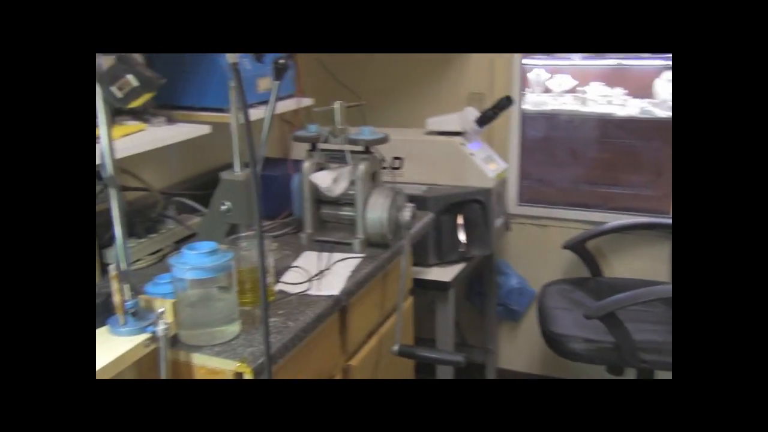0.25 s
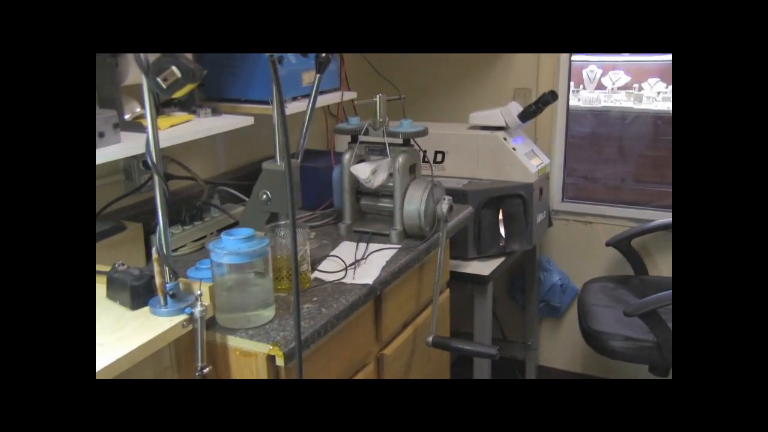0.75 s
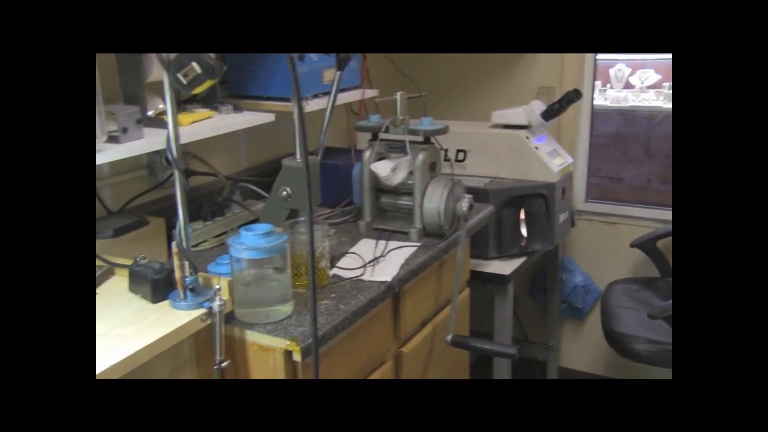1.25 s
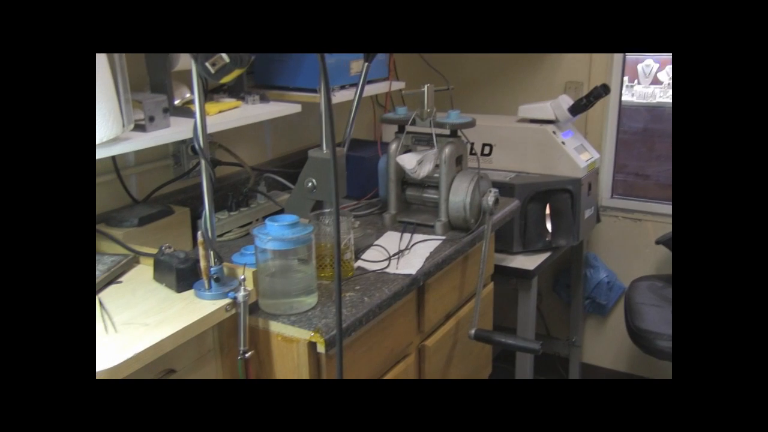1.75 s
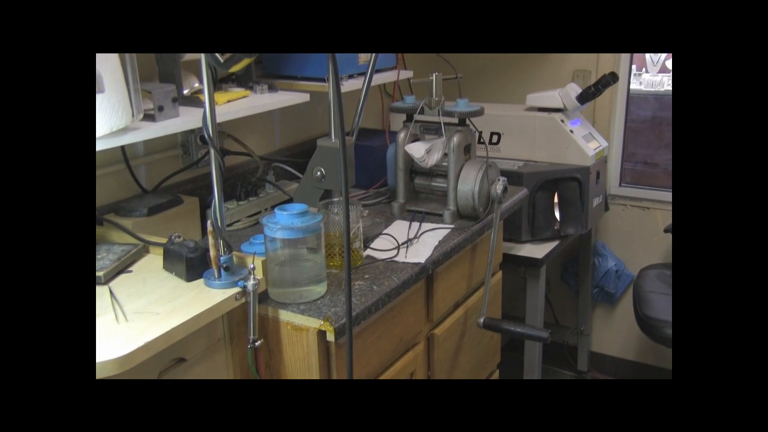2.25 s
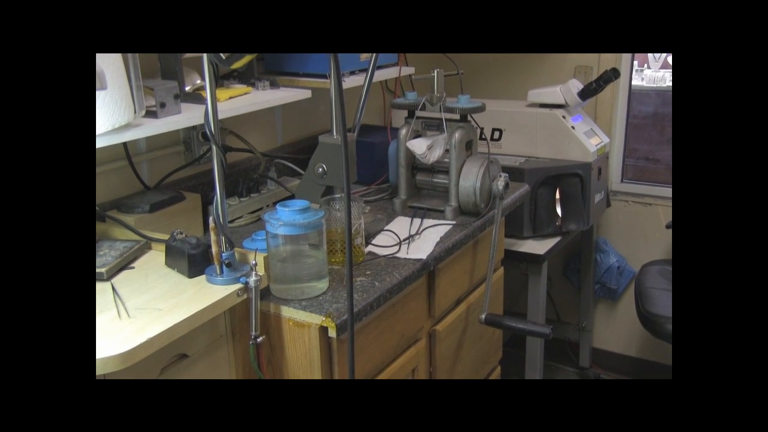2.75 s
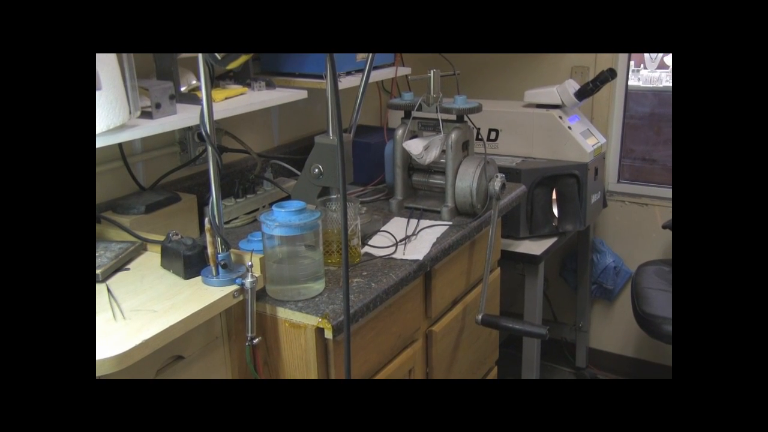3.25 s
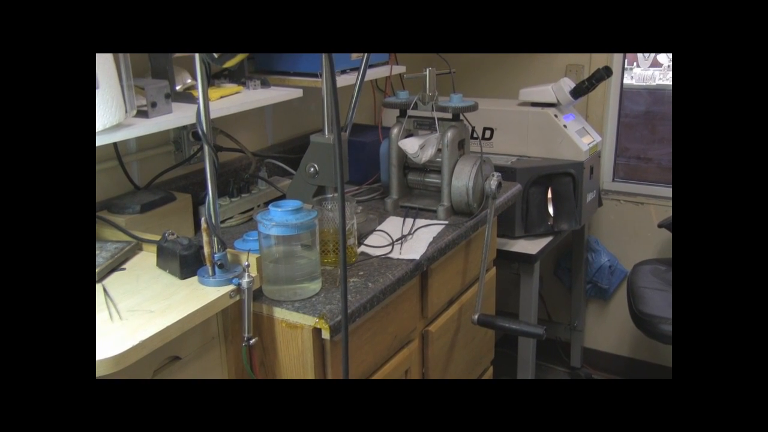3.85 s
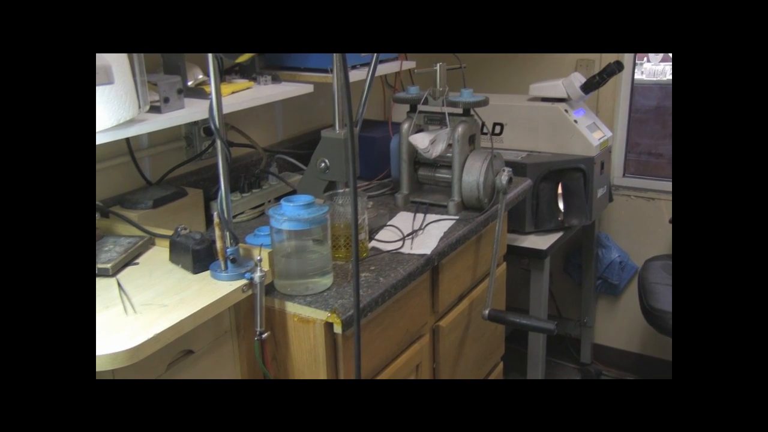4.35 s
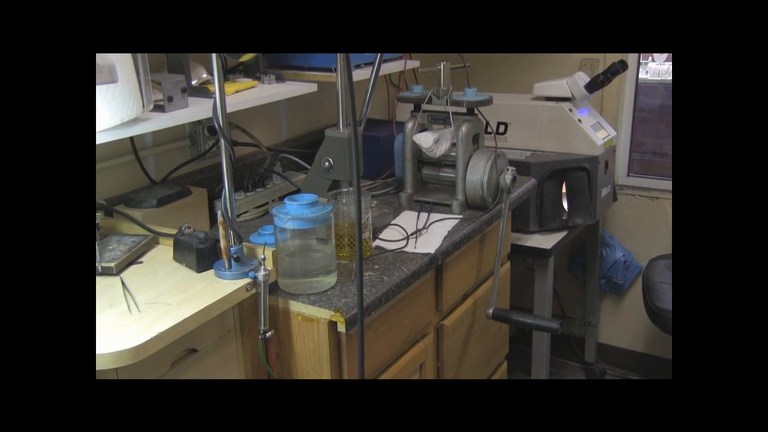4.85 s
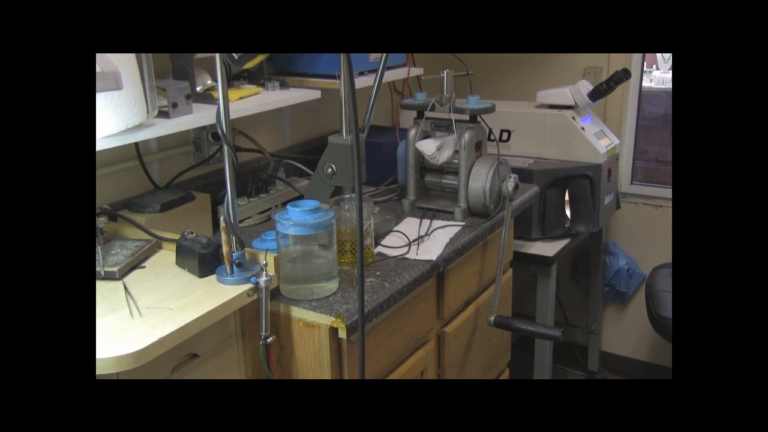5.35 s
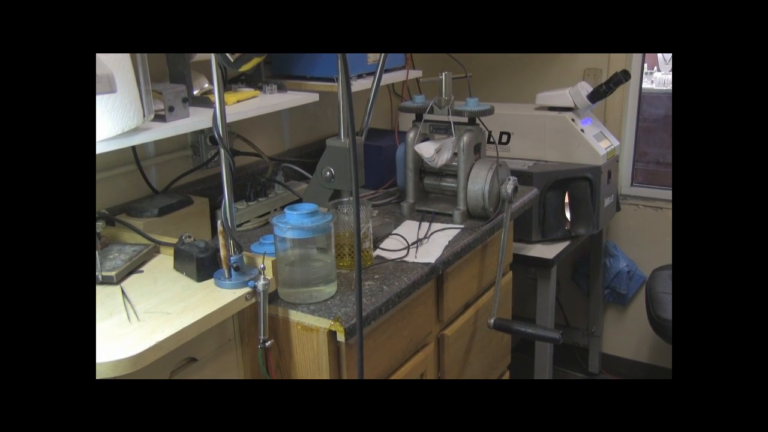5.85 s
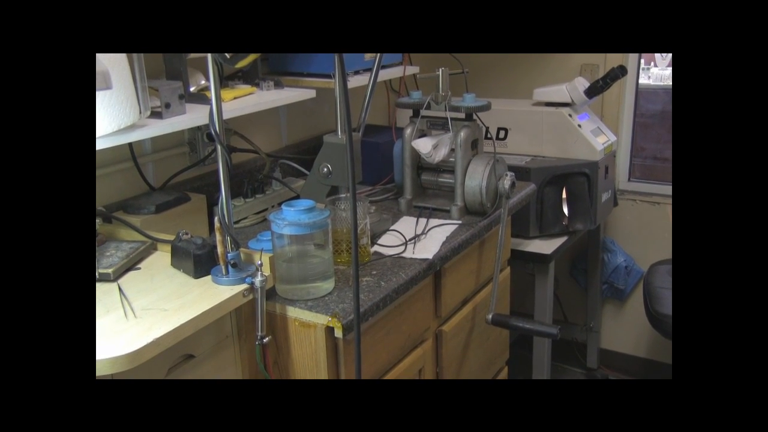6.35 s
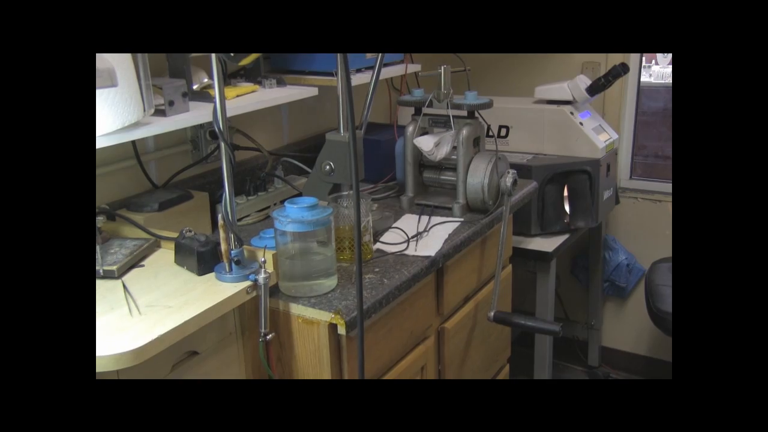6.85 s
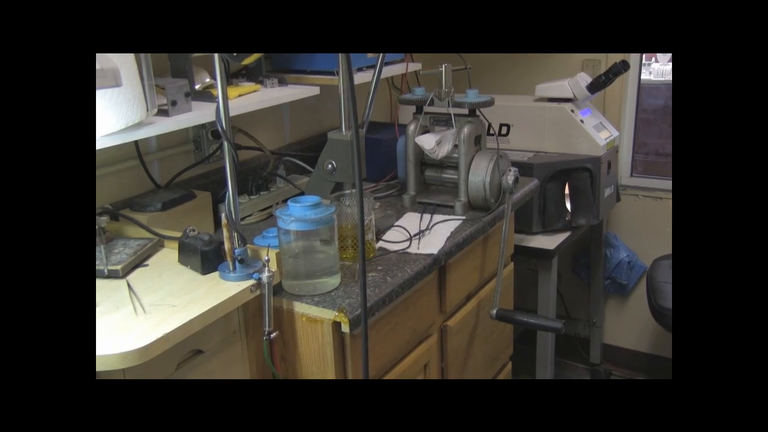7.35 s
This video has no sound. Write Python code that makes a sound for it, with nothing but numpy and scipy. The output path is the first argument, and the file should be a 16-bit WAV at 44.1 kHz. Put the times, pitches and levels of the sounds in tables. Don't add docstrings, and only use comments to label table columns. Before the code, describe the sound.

Two blasts of pressurised steam heard nearby in a hard-walled workroom. The first is short, whistling and spitting, ending in ragged puffs. A brief gap holds low room hum and a rattling metal clatter on the bench. A sharp double valve clack releases the second blast, wet and roaring at first, then dry, bright and long, with slight ticks before it tapers into a final click.

```python
import sys
import numpy as np
from scipy import signal
from scipy.fft import rfft, irfft, next_fast_len
from scipy.io import wavfile
from scipy.ndimage import uniform_filter1d

SR = 44100
rng = np.random.default_rng(int(sys.argv[2]) if len(sys.argv) > 2 else 0)


def attenuation_scalar(level_db):
    decades = np.asarray(level_db, float) / 20
    return 10 ** decades


def generate_wav(sig):
    pcm = np.round(np.clip(np.atleast_2d(sig).T, -1, 1) * 32767).astype(np.int16)
    wavfile.write(sys.argv[1], SR, pcm)


N = 335160

FRAME, HOP = 1024, 256
HZ = np.fft.rfftfreq(FRAME, 1 / SR)[:, None]
FRAME_S = (np.arange(N // HOP + 6) * HOP / SR)[None]
FINE_HZ = np.fft.rfftfreq(N, 1 / SR)
TIME_S = np.arange(N) / SR


def read(points, hz):
    f, value = np.transpose(points)
    return np.interp(np.log(hz + 1), np.log(f + 1), value)


def curves(rows, t):
    s, *columns = np.transpose(rows)
    return [np.interp(t, s, column) for column in columns]


def swells(base_db, rows, t):
    power = attenuation_scalar(2 * base_db)
    for s, db, half_s in rows:
        power = power + attenuation_scalar(2 * db) * np.exp(-((t - s) / half_s) ** 2)
    return 10 * np.log10(power)


def shape(points, lo_hz, hi_hz, grid=HZ):
    inside = (grid > points[0][0]) * (grid < points[-1][0])
    power = attenuation_scalar(2 * read(points, grid)) * inside
    return power / power[(grid > lo_hz) & (grid < hi_hz)].sum()


def peaks(modes, grid=HZ):
    out = 0
    for hz, width, db in modes:
        bump = 1 / (1 + (2 * (grid - hz) / width) ** 2) ** 2
        out = out + attenuation_scalar(2 * db) * bump / bump.sum(0)
    return out


def drift(size, *spans):
    z = rng.standard_normal(size)
    for axis, span in enumerate(spans):
        span = max(int(span), 1)
        z = uniform_filter1d(uniform_filter1d(z, span, axis), span, axis)
    return z / z.std()


def flutter(depth_db, span):
    return attenuation_scalar(depth_db * drift(N, span))


# frequency in Hz, likeness from 0 to 1.
COHERENCE = [(55, 1), (150, 0.9), (300, 0.79), (500, 0.95), (900, 0.26), (1700, 0.43), (3300, 0.23),
             (4700, 0.078), (6600, 0.56), (13000, 0.37)]
# frequency in Hz, left minus right in dB.
PORT_LEAN = [(60, 18), (110, 7), (200, 4), (380, 1.5), (700, -3.5), (1290, -2.5), (2380, -2), (4400, -0.5),
             (8120, -1.0), (15000, -2)]


def ports(first, second, lead, grid):
    alike = np.clip(read(COHERENCE, grid), 0, 1)
    turn = np.exp(-1j * read(lead, grid))
    left, right = attenuation_scalar(read(PORT_LEAN, grid) / 2), attenuation_scalar(-read(PORT_LEAN, grid) / 2)
    middle = (left ** 2 + right ** 2 + 2 * left * right * alike * turn.real) / 4
    mixed = alike * first + np.sqrt(1 - alike ** 2) * second
    return np.array([left * first, right * turn * mixed]) / np.sqrt(middle)


def steady(power, lead):
    a, b, c, d = rng.standard_normal((FINE_HZ.size, 4)).T
    return irfft(ports(a + 1j * b, c + 1j * d, lead, FINE_HZ) * np.sqrt(power) * N / 2, N)


# frequency in Hz, left lead in radians.
JET_PHASE = [(50, -2.5), (300, 0), (600, -2.14), (1200, -2.5), (1700, -3.5), (3300, -4.5), (4700, -6),
             (6600, -7), (9300, -7), (13000, -6)]


def noise(power, ripple_db, patchy_db):
    size = (FRAME_S.size, HZ.size)
    a, b, c, d = rng.standard_normal((*size, 4)).T
    z = ports(a + 1j * b, c + 1j * d, JET_PHASE, HZ)
    z *= attenuation_scalar(ripple_db * drift(size, 107, 1).T + patchy_db * drift(size, 7, 5).T)
    z *= np.sqrt(3 / 2 * power)
    return signal.istft(z, nperseg=FRAME, noverlap=FRAME - HOP)[1][:, :N]


# frequency in Hz, density in dB per Hz.
AIR_SPECTRUM = [(100, -53), (125, -6), (220, -4.5), (330, -6.5), (420, -2.5), (500, -3), (740, -4),
                (1010, -11), (1500, -12.5), (2500, -21.5), (5000, -27.5), (9000, -36), (15900, -36)]
# frequency in Hz, width in Hz, level in dB.
DUCT_MODES = [(146.7, 31.5, -2.5), (230.4, 51, -11.5), (430.4, 24, -7)]
# frequency in Hz, density in dB per Hz.
RUMBLE_SPECTRUM = [(15, 2), (40, -4), (75, -2), (115, -2)]
# frequency in Hz, left lead in radians.
ROOM_PHASE = [(100, -0.92), (420, -1.48), (800, -0.47), (1300, 1), (3300, -0.92), (13000, -0.42)]
# time in seconds, gain as air level in dB, bass cut in dB.
GAIN_CONTROL = [(0.0, -35, -14), (0.4, -35.5, -23), (0.9, -33, -13), (1.3, -35, -4.5), (1.688, -35.5, -5),
                (1.69, -41.5, -7), (2.05, -44.5, -9), (2.45, -43, -7), (2.7, -37.5, -28),
                (2.98, -44.5, -30), (3.63, -49, -20), (4.58, -50, -25), (4.66, -50.5, -50),
                (5.01, -51.5, -52), (5.1, -51, -19), (6.0, -49.5, -19), (7.2, -51.5, -14),
                (7.6, -43.5, -11)]
# middle in seconds, level in dB, half length in seconds.
DUCT_SURGES = [(0.253, -32.5, 0.11), (0.635, -31, 0.17), (0.83, -30, 0.062), (1.027, -32, .08),
               (1.197, -32.5, 0.054), (1.42, -45, 0.058), (2.474, -27.5, 0.046), (2.74, -37, 0.11),
               (3.097, -56, 0.12), (3.7, -52, 0.47), (4.7, -55.5, 0.28), (5.5, -57.5, .3),
               (7.0, -53.5, 0.086), (6.22, -48, 0.027), (6.307, -37.5, 0.027), (6.383, -39, .022),
               (6.6, -50, .03), (6.68, -53, 0.039)]
HUM_HZ, HUM_LEAD_RAD, HUM_LEAN_DB = 58.5, 0.9, 9.5
RUMBLE_DB = -5
DRONE_DB, DRONE_WOBBLE_DB = -22, 1


def room():
    air_db, cut_db = curves(GAIN_CONTROL, TIME_S)
    air = steady(shape(AIR_SPECTRUM, 220, 1010, grid=FINE_HZ), ROOM_PHASE)
    air = attenuation_scalar(air_db) * air * flutter(0.88, 1050)
    drone_db = air_db + DRONE_DB + DRONE_WOBBLE_DB * drift(N, 2600)
    drone_db = swells(drone_db, DUCT_SURGES, TIME_S)
    drone = attenuation_scalar(drone_db) * steady(peaks(DUCT_MODES, grid=FINE_HZ), JET_PHASE)
    rumble = attenuation_scalar(RUMBLE_DB) * steady(shape(RUMBLE_SPECTRUM, 15, 115, grid=FINE_HZ), ROOM_PHASE)
    turns = 2 * np.pi * HUM_HZ * TIME_S + np.array([[HUM_LEAD_RAD], [0]])
    hum = 2.3 * attenuation_scalar([[0], [-HUM_LEAN_DB]]) * np.sin(turns)
    return air + drone + attenuation_scalar(air_db + cut_db) * (hum + rumble)


# start in seconds, thud in dB, clack in dB, rasp in dB.
HARD_KNOCKS = [
    (1.424, -32, -32.5, -33),
    (1.7075, -24.5, -26.5, -28),
    (2.354, -21, -27.5, -35),
    (2.451, -27, -23, -30),
    (7.356, -33, -39, -55),
]
# start in seconds, thud in dB, clack in dB, rasp in dB.
SCRAPE_EVENTS = [(1.432, -40, -30, -34), (1.453, -53, -38, -36), (1.716, -33, -30, -26.5),
                 (1.745, -28, -25.5, -30), (1.771, -24, -23.5, -26), (1.80, -35, -25, -32),
                 (1.822, -43, -34, -36), (2.360, -30, -21, -18), (2.375, -22, -26, -41),
                 (2.40, -22, -28, -50), (2.425, -24, -30, -50), (2.475, -25, -41, -40)]
# start in seconds, thud in dB, clack in dB, decay by 60 dB in seconds.
SOFT_EVENTS = [(0.075, -21, -68.5, 0.13), (0.458, -48, -28.5, 0.25), (1.342, -35, -36, 0.2),
               (1.489, -60, -33, 0.12), (2.074, -43, -63, .18), (2.499, -33, -46, 0.11),
               (2.651, -30, -42, 0.11), (6.061, -34, -40, 0.12), (6.174, -36.5, -36, 0.29),
               (6.485, -38, -38, .15), (6.572, -42, -46, 0.18), (6.284, -37, -44, 0.28),
               (6.309, -39, -39.5, 0.36), (6.369, -45, -44, 0.075), (6.98, -44, -39.5, 0.29),
               (7.303, -39, -40, .2), (7.321, -47, -38, 0.15), (7.436, -42, -42, .16),
               (7.464, -56, -39.5, 0.15), (7.549, -50, -47, 0.22)]
# start in seconds, level in dB.
BENCH_BLOWS = [
    (1.4252, -9),
    (1.7082, -9.5),
    (1.789, -11),
    (2.3545, -20),
    (2.4482, -16),
    (2.4557, -8),
    (7.3563, -8.5),
]
# frequency in Hz, level in dB, decay by 60 dB in seconds.
BENCH_MODES = [(408, 1, 0.012), (700, 3.5, 0.0086), (950, -2, 0.022), (1420, -13, 0.015)]
# frequency in Hz, density in dB per Hz.
THUD_SPECTRUM = [(110, -25), (150, -12), (250, -1), (400, 0), (650, -1), (900, -4.5), (1200, -12),
                 (1700, -23), (2200, -21)]
# frequency in Hz, width in Hz, level in dB.
VALVE_MODES = [(2000, 100, -0.5), (2330, 230, -1.5), (2604, 54, -3), (1620, 60, -11)]
# frequency in Hz, density in dB per Hz.
VALVE_BODY = [(1000, -6), (1200, 3), (2600, -1.5), (2800, -4), (3400, -2.5)]
# frequency in Hz, density in dB per Hz.
RASP_SPECTRUM = [(2500, -39), (3300, 3), (4600, 2), (6000, -2.5), (10000, -12), (16000, -30)]
KNOCK_RISE_T60, SCRAPE_RISE_T60 = (0.0017, 0.19), (0.0056, 0.14)
SOFT_RISE_S, SOFT_RASP_DB = 0.0031, -59


def knocks():
    events = [(*row, *KNOCK_RISE_T60) for row in HARD_KNOCKS]
    events += [(*row, *SCRAPE_RISE_T60) for row in SCRAPE_EVENTS]
    events += [(*row, SOFT_RASP_DB, SOFT_RISE_S, t60) for *row, t60 in SOFT_EVENTS]
    powers = np.zeros((3, N))
    for s, *db, rise, t60 in events:
        start = round(s * SR)
        since = TIME_S[:N - start][:SR // 2]
        swing = (1 - np.exp(-since / rise)) * attenuation_scalar(-60 * since / t60)
        powers[:, start:start + SR // 2] += (attenuation_scalar(db)[:, None] * swing) ** 2
    thud = shape(THUD_SPECTRUM, 160, 1700, grid=FINE_HZ)
    clack = 0.26 * peaks(VALVE_MODES, grid=FINE_HZ) + 1.22 * shape(VALVE_BODY, 1370, 3100, grid=FINE_HZ)
    rasp = shape(RASP_SPECTRUM, 3400, 12000, grid=FINE_HZ)
    shaking = 0
    for power, colour in zip(powers, (thud, clack, rasp)):
        shaking = shaking + np.sqrt(power) * steady(colour, JET_PHASE)

    blows = np.zeros(N)
    for s, db in BENCH_BLOWS:
        blows[round(s * SR)] = attenuation_scalar(db)
    t = TIME_S[:4000]
    ring = sum(attenuation_scalar(db - 60 * t / t60) * np.sin(2 * np.pi * hz * t) for hz, db, t60 in BENCH_MODES)
    ring = ring * (1 - np.exp(-t / 0.00078))
    ring = signal.lfilter(*signal.butter(2, 150, "high", fs=SR), ring)
    bench = signal.oaconvolve(blows, ring)[:N] / 2
    return shaking - bench * attenuation_scalar([[0], [1.5]])


# start in seconds, level in dB, frequency in Hz, width in Hz,
# decay by 60 dB in seconds.
DROP_RINGS = [(.454, -24, 1920, 2000, 0.25), (1.039, -20.5, 2706, 403, 0.33), (1.08, -29, 3350, 150, 0.68),
              (1.252, -14.5, 6750, 300, 0.012), (1.297, -24, 4200, 600, 0.025),
              (1.325, -27, 12200, 7000, 0.054), (1.403, -32, 12600, 6000, .07),
              (2.358, -21, 650, 200, 0.17), (2.628, -32.5, 347, 60, 0.5), (2.8, -42, 341, 60, 0.88),
              (1.343, -29, 3560, 350, 0.06), (1.376, -41, 7200, 800, .04), (1.377, -36, 13000, 5000, .04),
              (1.492, -26, 3920, 900, 0.091), (1.709, -26, 324, 120, 0.16), (2.413, -24.5, 464, 80, 0.4),
              (1.78, -22, 700, 296, 0.19), (2.363, -18, 2000, 90, 0.09), (2.488, -22.5, 453, 120, 0.17),
              (7.315, -35.5, 2580, 250, .2), (7.356, -28, 950, 900, .22), (7.46, -43, 723, 151, .9),
              (7.551, -41, 1620, 100, 0.6)]
# start in seconds, level in dB, frequency in Hz, # width in Hz, decay
# by 60 dB in seconds.
FURTHER_RINGS = [(1.7085, -27.5, 2360, 60, 0.15), (1.717, -26, 2540, 80, .08), (1.727, -22, 2420, 70, .07),
                 (1.5, -20.5, 380, 130, 0.039), (1.74, -32, 1500, 67, .15), (1.768, -24, 590, 170, 0.059),
                 (1.788, -13.5, 612, 200, .05), (1.79, -29, 1610, 78, 0.21), (1.817, -27, 1800, 140, .15),
                 (1.433, -19.5, 3300, 1100, 0.083), (1.436, -28, 4500, 1200, .06),
                 (2.362, -28, 2420, 51, 0.26), (2.37, -17, 2000, 60, 0.065), (2.366, -17.5, 760, 150, .08),
                 (2.362, -22, 8500, 4500, 0.15), (2.456, -23, 1850, 500, .1),
                 (2.446, -24, 16000, 2500, .15), (3.1, -20, 13500, 4000, .06), (6.183, -30, 1400, 400, .1),
                 (5.4, -30, 1050, 120, 0.088), (6.06, -38, 430, 200, 0.074), (6.297, -38, 530, 200, .1),
                 (6.31, -41, 1220, 120, .2), (6.505, -37, 1300, 120, .15), (7.322, -36, 1900, 200, .1),
                 (7.365, -31, 1150, 320, 0.17), (7.456, -36, 1950, 250, .08), (0.96, -32, 8050, 250, .35),
                 (2.358, -24, 1300, 300, .2), (2.396, -30, 2400, 500, .12), (1.3685, -30, 3500, 500, .03),
                 (1.335, -33, 9500, 2000, .05)]
# start in seconds, level in dB, frequency in Hz.
WATER_SPITS = [
    (.044, -18, 7130),
    (.239, -17, 6450),
    (.29, -15.5, 5480),
    (.31, -16, 6850),
    (0.349, -16, 5950),
    (0.597, -17, 6830),
    (.81, -18, 6570),
    (.865, -16, 6600),
    (1.297, -27, 6940),
    (1.398, -39, 6070),
]
SPIT_WIDTH_HZ, SPIT_T60 = 2000, 0.068


def spits():
    length = 8000
    out, t = np.zeros((2, N + length)), np.arange(length) / SR
    water = [(*row, SPIT_WIDTH_HZ, SPIT_T60) for row in WATER_SPITS]
    for s, db, hz, width, t60 in DROP_RINGS + water + FURTHER_RINGS:
        ragged = 120 / width + drift((length, 2), SR / width / 2).T
        lag = read(JET_PHASE, hz) * np.array([[0], [1]])
        ring = np.sin(2 * np.pi * (hz * t + rng.random()) - lag)
        ring = ring * (1 - np.exp(-hz * t))
        start = round(s * SR)
        out[:, start:start + length] += attenuation_scalar(db - 60 * t / t60) * ragged * ring
    return out[:, :N]


# time in seconds, hiss in dB.
PUFF_LEVEL = [(0.0, -27.5), (0.36, -25.5), (0.55, -25), (1.02, -27.5), (1.142, -25.5), (1.242, -37.5),
              (1.33, -42), (1.46, -45), (1.51, -50), (1.572, -61), (1.69, -50)]
# frequency in Hz, density in dB per Hz.
PUFF_SPECTRUM = [(530, -42), (900, -3.5), (1620, -8.5), (1830, -3), (2190, -4), (2530, -1), (4720, -3),
                 (5200, -1), (7920, -0.5), (14100, -10.5), (15900, -10)]
# frequency in Hz, rise in Hz per second, width in Hz, level in dB.
NOZZLE_WHISTLE = (10102, 380, 440, 5)
# frequency in Hz, width in Hz, level in dB.
HOSE_MODES = [(1884, 110, -8), (3420, 73, -13)]
# frequency in Hz, width in Hz, level in dB.
SLEEVE_MODES = [(1790, 110, -18), (3500, 80, -28), (5150, 120, -14), (7130, 600, -13), (7970, 330, -10),
                (13700, 150, -20)]
# middle in seconds, level from the hiss in dB, half length in seconds.
HOSE_SWELLS = [
    (.0, -26, .05),
    (0.474, -15, 0.052),
    (0.804, -4.5, 0.28),
    (1.11, 2.5, 0.042),
]
# middle in seconds, level from the hiss in dB, half length in seconds.
EDGE_SWELLS = [
    (.2, -6, 0.12),
    (.66, -7, 0.074),
    (0.933, -0.5, 0.15),
    (1.15, 1, 0.033),
]
# start in seconds, level over the hiss in dB.
GASPS = [
    (1.254, 3.1),
    (1.298, 4.4),
    (1.325, 7),
    (1.376, 5.4),
    (1.402, 5.5),
    (1.485, 3),
]
NOZZLE_DB, NOZZLE_FALL_DB_PER_S = -8, 16
HOSE_DB, EDGE_DB = -27, -21
EDGE_HZ_MID, EDGE_CLIMB_HZ, EDGE_CLIMB_S = 5540, 330, 0.45
SHUT_S, SHUT_THIN_DB, SHUT_THIN_HZ = 1.22, 5, 3000
GASP_T60 = 0.031


def puff():
    hiss_db, = curves(PUFF_LEVEL, FRAME_S)
    power = 0.58 * shape(PUFF_SPECTRUM, 3000, 15000) + peaks(SLEEVE_MODES)

    hz, rise, width, db = NOZZLE_WHISTLE
    nozzle_db = NOZZLE_DB - NOZZLE_FALL_DB_PER_S * FRAME_S
    nozzle_hz = hz + rise * np.minimum(FRAME_S, 0.6)
    power = power + attenuation_scalar(2 * nozzle_db) * peaks([(nozzle_hz, width, db)])
    hose_db = swells(HOSE_DB, HOSE_SWELLS, FRAME_S)
    power = power + attenuation_scalar(2 * hose_db) * peaks(HOSE_MODES)
    edge_db = swells(EDGE_DB, EDGE_SWELLS, FRAME_S)
    edge_hz = EDGE_HZ_MID - EDGE_CLIMB_HZ * np.exp(-(FRAME_S / EDGE_CLIMB_S) ** 2)
    power = power + attenuation_scalar(2 * edge_db) * peaks([(edge_hz, 330, -4)])

    shut = np.clip((FRAME_S - SHUT_S) / 0.04, 0, 1)
    middle = np.exp(-(np.log2((HZ + 1) / SHUT_THIN_HZ) / 0.7) ** 2)
    power = power * attenuation_scalar(-2 * SHUT_THIN_DB * shut * middle)
    sounding = FRAME_S < PUFF_LEVEL[-1][0]
    hiss = noise(power * attenuation_scalar(2 * hiss_db) * sounding, ripple_db=1.0, patchy_db=1.0)

    gasps = 1
    for s, db in GASPS:
        since = np.maximum(TIME_S - s, 0)
        gasps = gasps + (TIME_S > s) * attenuation_scalar(db - 60 * since / GASP_T60)
    return hiss * flutter(0.73, 300) * gasps


# time in seconds, hiss in dB, dryness as tilt in dB per octave.
JET_LEVEL = [(2.44, -29, -4), (2.46, -25.5, 1), (2.51, -19, 2), (2.58, -21, 2), (2.63, -22.5, -2.5),
             (3.07, -21.5, -1.5), (3.7, -20, -1), (3.99, -22, 0), (4.18, -19.5, -0.5), (4.39, -23, 0),
             (4.95, -19.5, 1), (5.21, -22, -0.1), (5.72, -20, 1), (5.93, -22, 1.5), (6.42, -21, 1.5),
             (6.7, -24, 0.8), (7.06, -26, 1), (7.35, -36, -0.5), (7.5, -51.5, -6)]
# frequency in Hz, density in dB per Hz.
JET_SPECTRUM = [(880, -45), (1500, -1), (1760, -12), (2180, -6.5), (2410, -27.5), (3310, -12.5),
                (3610, -5.5), (5530, -2.5), (6160, 0), (7210, -1), (14300, -3), (15900, -6.5)]
# frequency in Hz, density in dB per Hz.
ROAR_SPECTRUM = [(290, -25.5), (500, -29.5), (597, -23.5), (933, -23), (1200, -19), (1290, -22),
                 (3320, -7.5), (6000, -7), (7800, -32), (13200, -120)]
# frequency in Hz, width in Hz, level in dB.
JET_WHISTLES = [(5950, 35, 0), (6130, 30, -2), (6400, 50, -19), (8050, 43, -0.5), (8900, 55, -10),
                (12200, 90, -14), (1226, 30, -20)]
# middle in seconds, level from the hiss in dB, half length in seconds.
WHISTLE_SWELLS = [
    (5.5, -26, .5),
    (3.3, -15, 0.28),
    (4.15, -14, 0.47),
    (4.99, -13.5, .15),
    (5.8, -29, .3),
]
ROAR_DB, TONE_DB = -15, -30
ROAR_LAG, FULL_DB = 0.25, -19.5
WATER_S, WATER_DB, WATER_CLEARS_S = 2.62, 10.5, 0.38


def jet():
    hiss_db, tilt_db = curves(JET_LEVEL, FRAME_S)
    upper = 1 / (1 + (2600 / (HZ + 1)) ** 6)
    tilt = attenuation_scalar(2 * tilt_db * np.log2((HZ + 1) / 8000))
    hiss = shape(JET_SPECTRUM, 3000, 15200) * tilt * upper
    water = (FRAME_S > WATER_S) * np.exp(-abs(FRAME_S - WATER_S) / WATER_CLEARS_S)
    roar_db = ROAR_DB + WATER_DB * water + ROAR_LAG * np.maximum(FULL_DB - hiss_db, 0)
    roar = attenuation_scalar(2 * roar_db) * shape(ROAR_SPECTRUM, 1000, 2980) * (1 - upper)
    whistles = attenuation_scalar(2 * swells(TONE_DB, WHISTLE_SWELLS, FRAME_S)) * peaks(JET_WHISTLES)
    flow = noise(hiss + roar + whistles, ripple_db=2.0, patchy_db=0.67)
    valve = np.clip((TIME_S - JET_LEVEL[0][0]) / 0.0081, 0, 1)
    return flow * attenuation_scalar(curves(JET_LEVEL, TIME_S)[0]) * valve * flutter(0.43, 220)


WALLS_T60, WALLS_DELAY_S = 0.2, 0.0041
WALLS_SHARE, SHIFTS_PER_S = 0.19, 0.2


def walls(x):
    t, size, wet = np.arange(SR // 2) / SR, next_fast_len(N + SR), 0
    grid = np.fft.rfftfreq(size, 1 / SR)
    decay = attenuation_scalar(-60 * t / WALLS_T60) * (1 - np.exp(-t / WALLS_DELAY_S))
    for k in range(3):
        paths = rng.standard_normal((t.size, 2)).T * decay
        first, second = rfft(paths / np.linalg.norm(paths[0]), size)
        fade = np.sqrt(2 / 3) * np.cos(np.pi * (SHIFTS_PER_S * TIME_S + k / 3))
        wet = wet + rfft(x.mean(0) * fade, size) * ports(first, second, JET_PHASE, grid)
    return np.sqrt(1 - WALLS_SHARE) * x + np.sqrt(WALLS_SHARE) * irfft(wet, size)[:, :N]


def scene():
    return room() + walls(knocks() + spits() + puff() + jet())


def low_pass(x):
    return signal.sosfilt(signal.butter(12, 15830, fs=SR, output="sos"), x)


def record(dry):
    return low_pass(dry)


dry = scene()
out = record(dry)
generate_wav(out)
```